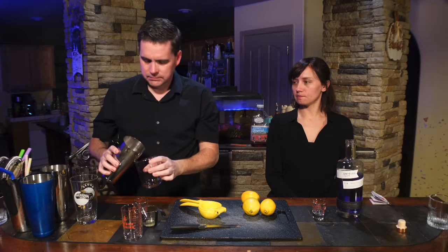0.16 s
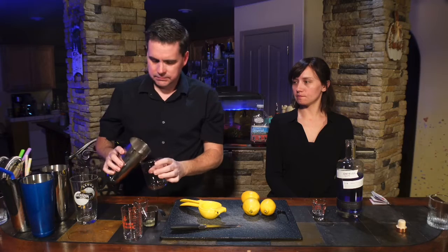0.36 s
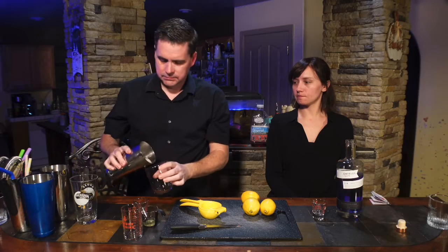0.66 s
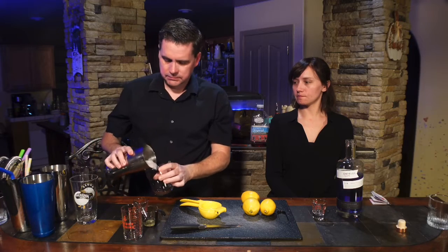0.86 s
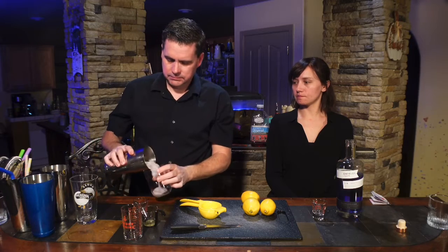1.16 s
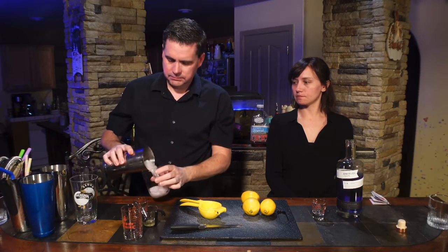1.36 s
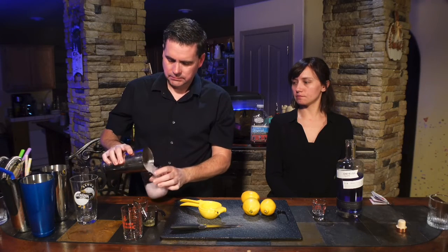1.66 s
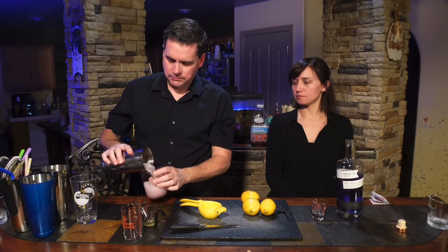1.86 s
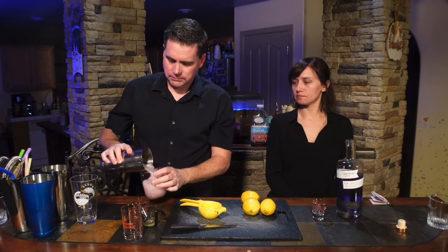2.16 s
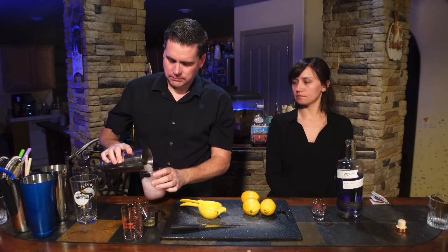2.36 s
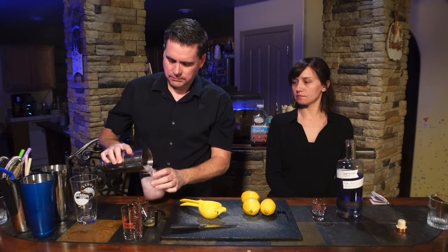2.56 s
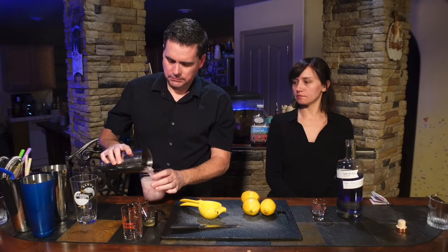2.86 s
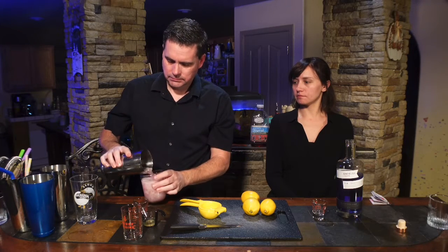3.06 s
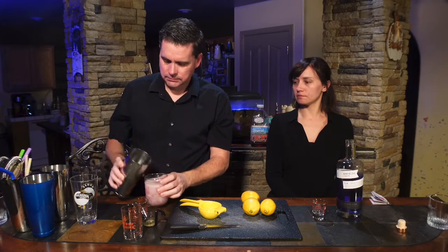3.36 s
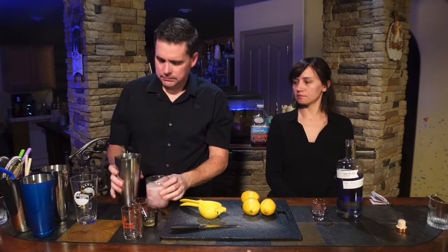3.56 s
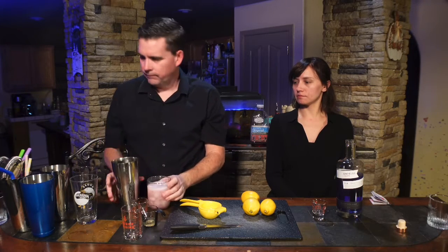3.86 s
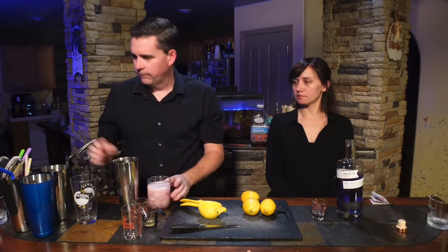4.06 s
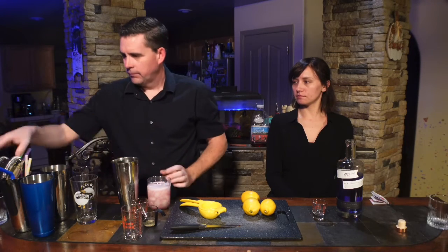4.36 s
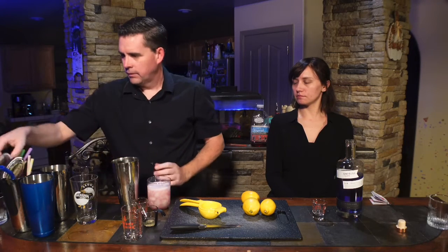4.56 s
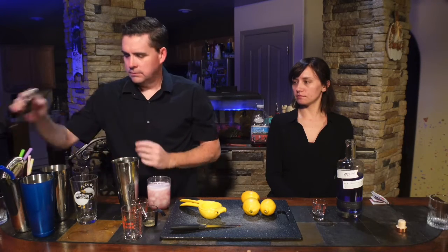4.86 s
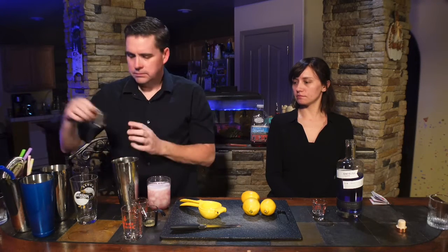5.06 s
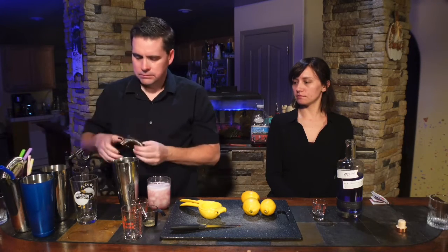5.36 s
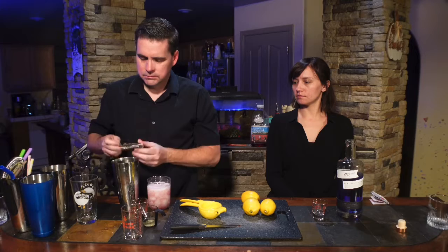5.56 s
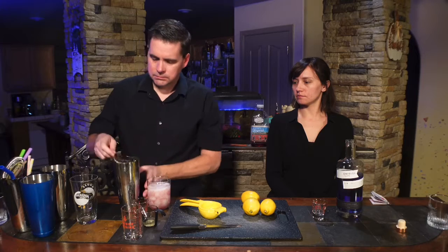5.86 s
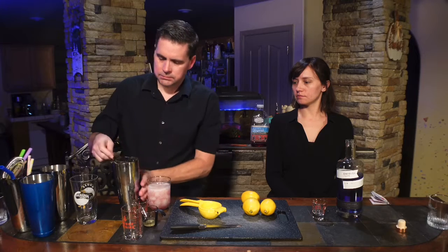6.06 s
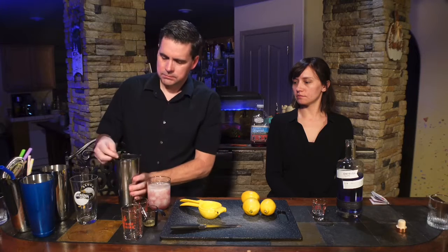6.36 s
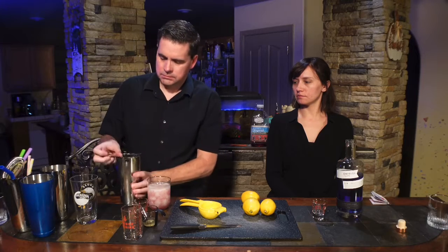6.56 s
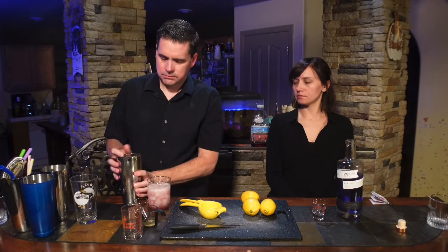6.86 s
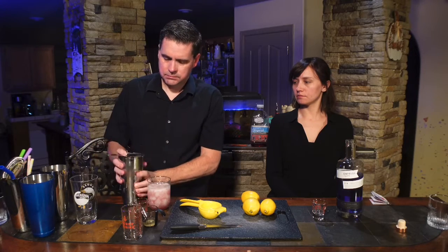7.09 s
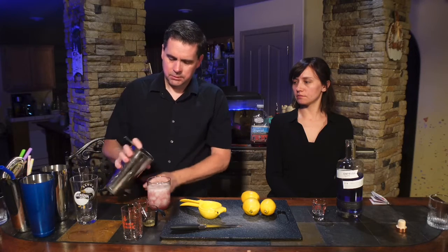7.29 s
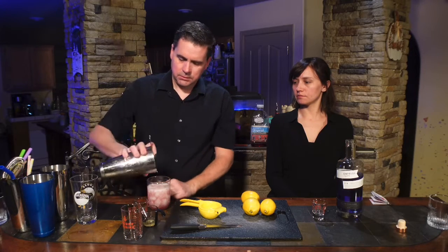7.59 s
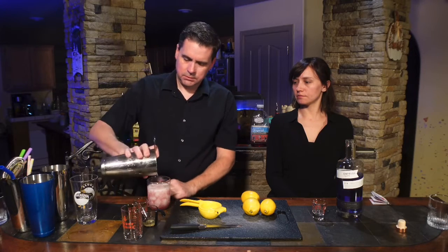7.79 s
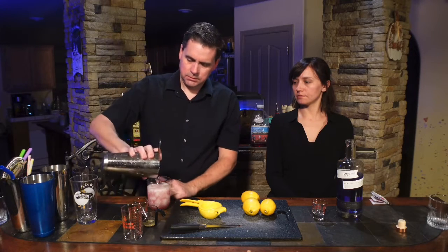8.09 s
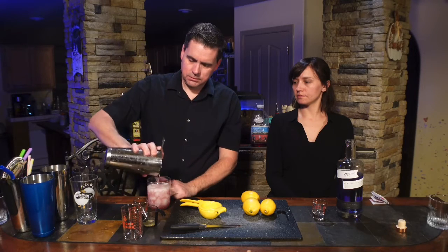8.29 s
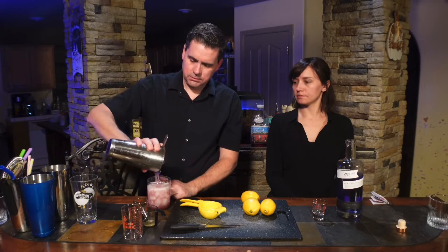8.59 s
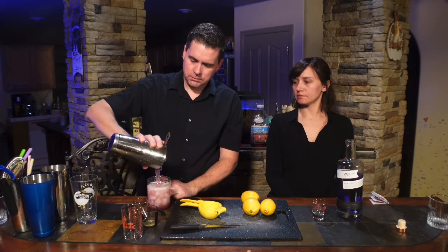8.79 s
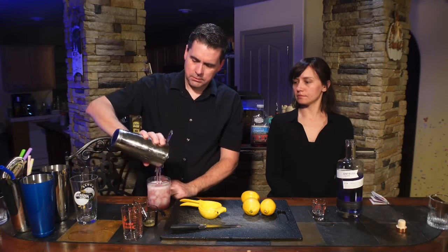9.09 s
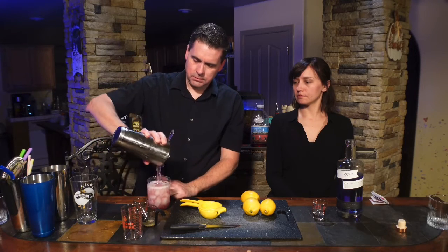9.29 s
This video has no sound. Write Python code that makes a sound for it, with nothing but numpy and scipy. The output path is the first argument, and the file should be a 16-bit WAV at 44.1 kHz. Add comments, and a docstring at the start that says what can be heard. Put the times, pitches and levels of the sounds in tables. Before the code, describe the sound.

Liquid dribbles from a metal shaker, then ice and drink tumble into a glass; shaker knocks, a strainer clinks and rasps, and a thin trickle follows.

```python
"""A little drink dribbles from a steel shaker into a glass, then ice and drink pour in together.
Cubes clack, shards tinkle and air pockets ring; the glass's hollow note climbs during the pour.
The shaker knocks down on the bar, a spring strainer clinks, its coils rasp over the rim, and the base drags.
Last, the rest trickles out. Blows are noise bursts and fading tones; flows are showers of tiny impacts.
A live, stone-walled room answers every sound, over a steady hiss and faint hum."""
import sys
import numpy as np
from scipy import signal
from scipy.io import wavfile
from scipy.ndimage import uniform_filter1d

SR = 44100
rng = np.random.default_rng(int(sys.argv[2]) if len(sys.argv) > 2 else 0)


def put_to_file(sound):
    """Save the sound as 16-bit audio at rate SR, in the file named by the first command-line argument."""
    columns = np.atleast_2d(sound).T  # one column per channel
    safe = np.clip(columns, -1, 1)
    whole_steps = np.round(safe * 32767)
    wavfile.write(sys.argv[1], SR, whole_steps.astype(np.int16))


N = 415863
TIME = np.arange(N) / SR
RING_TIME = TIME[:SR // 2]  # half a second, for single blows
EDGE_HZ = 15950  # nothing sounds above this
# Levels in the tables are relative: the settings ending in _db shift them. t60 is the time to fade by 60 dB.


def amp(db):
    """Turns decibels into gain."""
    return 10 ** (np.asarray(db) / 20)


def unit(x):
    """Scales a sound to an average (rms) level of 1."""
    return x / np.sqrt(np.mean(x ** 2) + 1e-20)


def unit_peak(x, size=132):
    """Scales a sound so that its loudest stretch of `size` samples has rms 1."""
    return x / np.sqrt(uniform_filter1d(x ** 2, size, mode="constant").max() + 1e-20)


def read(points, hz):
    """Reads a table of frequencies on a logarithmic axis."""
    f, value = np.transpose(points)
    return np.interp(np.log(hz + 1), np.log(f + 1), value)


def level(rows):
    """Turns a level curve into gain over time, silent outside the curve."""
    s, db = np.transpose(rows)
    return amp(np.interp(TIME, s, db)) * (TIME >= s[0]) * (TIME <= s[-1])


def add(mix, s, sound):
    """Mixes a sound in at time s."""
    part = mix[max(round(s * SR), 0):][:len(sound)]
    part += sound[:len(part)]


def colour(x, spectrum, size=4096):
    """Filters to a given spectrum without sounding ahead of time, so attacks stay sharp."""
    log_gain = np.log(amp(read(spectrum, abs(np.fft.fftfreq(size, 1 / SR)))))
    minimum_phase = np.exp(np.conj(signal.hilbert(log_gain)))
    taps = np.fft.ifft(minimum_phase).real[:size // 2]
    return signal.fftconvolve(x, taps)[:len(x)]


def high_pass(x, hz, order=4):
    """Removes what lies below hz."""
    return signal.sosfilt(signal.butter(order, hz, "high", fs=SR, output="sos"), x)


def resonate(x, hz, width_hz):
    """A resonance of gain 1 whose pitch follows hz, a number or a curve."""
    turn = np.exp(2j * np.pi * np.cumsum(hz * np.ones(len(x))) / SR)
    r = np.exp(-np.pi * width_hz / SR)
    # shift the pitch down to zero, smooth, and shift it back
    return 2 * (turn * signal.lfilter([1 - r], [1, -r], x / turn + 1e-18)).real


def contact(t60):
    """The dense, quickly dying chatter of one blow: fading noise."""
    return rng.standard_normal(len(RING_TIME)) * np.exp(-np.log(1000) * RING_TIME / t60)


def ring(modes, detune=0.0016):
    """Fading tones; grip and point of contact weight and detune them anew for each blow."""
    hz, db, t60 = np.transpose(modes)[:, :, None]
    weight, phase, shift = rng.standard_normal((3, len(modes), 1))
    hz = hz * (1 + detune * shift)
    size = amp(db + 3 * weight) * (hz < EDGE_HZ)
    fade = np.exp(-np.log(1000) * RING_TIME / t60)
    tones = size * fade * np.sin(2 * np.pi * (hz * RING_TIME + phase))
    return unit_peak(tones.sum(0))


def jangle(modes, t60, detune=0.0074):
    """Modes struck by three chattering contacts, each detuned afresh, which smears their pitch."""
    rings = sum(signal.fftconvolve(contact(t60), ring(modes, detune))[:len(RING_TIME)] for _ in range(3))
    return unit_peak(rings)


def grains(per_s, spread_db):
    """Random tiny impacts, mostly small and a few large."""
    size = amp(spread_db * np.minimum(rng.exponential(1, N), 4)) * rng.choice([-1, 1], N)
    return unit(size * (rng.random(N) < per_s / SR))


def strokes(rows, attack_s, release_s, swell_db):
    """Gain over time of rubbing strokes: each sets in, swells or eases while it lasts, and dies away."""
    out = np.zeros(N)
    for start, length, db in rows:
        age = np.maximum(TIME - start, 0)
        held = amp(db + swell_db * (np.minimum(age / length, 1) - .5))
        out += np.minimum(age / attack_s, 1) * held * np.exp(-np.maximum(age - length, 0) / release_s)
    return out


def wander(span_s):
    """Smooth random motion of rms 1 that changes over about span_s."""
    size = max(int(span_s * SR), 2)
    return unit(uniform_filter1d(uniform_filter1d(rng.standard_normal(N), size), size // 2))


def bubbles(per_s, low_hz, high_hz, cycles, count=24):
    """Small bubbles of many sizes, each a short ping that rises in pitch."""
    out, t = np.zeros(N), RING_TIME[:SR // 20]
    for hz in np.geomspace(low_hz, high_hz, count):
        age = t * hz / cycles
        ping = np.exp(-age) * np.sin(2 * np.pi * hz * t * (1 + .01 * age))
        for s, luck, size in rng.random((round(N / SR) * 10, 3)):
            if luck < per_s / count / 10:
                add(out, s * N / SR, amp(16 * size) * ping)
    return unit(out)


# note of the air above the drink: (time [s], pitch [Hz])
HOLLOW_NOTE = [(0, 970), (.7, 876), (1.12, 730), (1.42, 733), (1.62, 800), (1.85, 964), (2.2, 1160),
               (2.7, 1288), (7.6, 1274), (9.4, 1310)]


def hollow_hz(s):
    """The hollow note at time s, read from HOLLOW_NOTE: it sinks in the dribble, then climbs in the pour."""
    return np.interp(s, *np.transpose(HOLLOW_NOTE))


def hollow(x, hz, width_hz):
    """The air above the drink: one resonance, with no bass below it."""
    return high_pass(resonate(resonate(x, hz, 2 * width_hz), hz, width_hz), hz=464)


def stream(flow, spectrum, per_s, splash_db, bubble_db, hollow_db, width_hz, hollow_growth, lumpy_db):
    """Drops and chips patter into the glass, raise bubbles and sound its hollow note."""
    drops = grains(per_s, spread_db=4)
    fizz = bubbles(per_s=180, low_hz=1100, high_hz=7000, cycles=14)
    patter = amp(splash_db) * unit(colour(drops, spectrum)) + amp(bubble_db) * fizz
    gain = level(flow)
    # the share of the hollow note changes with the flow
    share = np.maximum(gain / gain.max(), amp(-40)) ** hollow_growth
    air_note = unit(hollow(drops, hollow_hz(TIME), width_hz)) * share
    lumps = unit(amp(lumpy_db * wander(span_s=0.038)))
    return gain * lumps * (patter + amp(hollow_db) * air_note)


# colour of the room's hiss: (frequency [Hz], level per Hz [dB])
HISS_COLOUR = [(15, -90), (25, -34), (130, -18.5), (170, -14), (384, -6.5), (775, 1.5), (1260, 1.5),
               (1480, 2.5), (2110, 2), (2350, -2), (3430, 2), (4140, -2.5), (10400, -5.5), (14800, -13.5),
               (16000, -12.5)]
# tones of the hum: (frequency [Hz], level [dB])
HUM_TONES = [(120, -99), (180, -83.5)]


def air(hiss_db=-56.5, side_db=-13):
    """Steady room hiss, partly different in each ear, and a faint mains hum."""
    mid, side = (unit(colour(noise, HISS_COLOUR)) for noise in rng.standard_normal((2, N)))
    hum = sum(amp(db) * unit(np.sin(2 * np.pi * hz * TIME)) for hz, db in HUM_TONES)
    return amp(hiss_db) * (mid + np.array([[1], [-1]]) * amp(side_db) * side) + hum


# flow of the first liquid over the shaker's lip: (time [s], level [dB])
DRIBBLE_FLOW = [(0.0, -49.5), (0.076, -48.5), (0.468, -62.5), (0.762, -39), (1.1, -43)]
# colour of wet sliding, for the dribble and for ice on steel: (frequency [Hz], level per Hz [dB])
SLIDE_COLOUR = [(100, -63), (350, -27.5), (900, -0.5), (1600, 3.5), (2600, 9), (4000, 1.5), (7000, -2),
                (11000, -6.5), (16000, -13)]


def dribble():
    """The first liquid runs evenly into the glass, with patter and bubbles about equally strong."""
    return stream(DRIBBLE_FLOW, SLIDE_COLOUR, per_s=1300, splash_db=-14.0, bubble_db=-15,
                  hollow_db=-11.5, width_hz=220, hollow_growth=0.0634, lumpy_db=0.0)


# fingers brushing over the strainer's spring and the wet steel: (start [s], length [s], level [dB])
BRUSH_STROKES = [(.048, 0.014, -57), (4.09, 0.04, -53), (5.248, 0.006, -56), (5.55, 0.051, -49.5),
                 (8.855, 0.011, -52.5), (9.04, 0.046, -53), (9.29, 0.053, -49.5)]
# colour of the brushing: (frequency [Hz], level per Hz [dB])
BRUSH_COLOUR = [(300, -36), (2000, -8.5), (5000, -5), (8000, -7.5), (13000, -7.5), (16000, -27)]


def brushes():
    """Fingers catch on many tiny bumps as they brush along the metal."""
    touch = unit(colour(grains(per_s=2700, spread_db=5.5), BRUSH_COLOUR))
    return strokes(BRUSH_STROKES, attack_s=0.0022, release_s=0.028, swell_db=0.5) * touch


# single crunches of wet ice, loud and faint, the first a soft one before the pour:
# (time [s], crunch level [dB], level of the glass's hollow [dB])
SINGLE_CRUNCHES = [(0.053, -42, -46), (1.320, -28, -14), (1.415, -15.5, -46), (1.5938, -16, -17.5),
                   (1.8445, -17.5, -31), (2.014, -23, -37), (2.2182, -26, -20), (2.2616, -17, -34),
                   (2.5355, -43, -27.5)]
# colour of rattling ice: (frequency [Hz], level per Hz [dB])
RATTLE_COLOUR = [(40, -41.5), (120, -40), (350, -5.5), (700, -5.5), (1600, 2), (2500, 0.5), (4000, 4.5),
                 (5600, 0.5), (7200, 4.5), (10000, -3), (16000, -29)]
# tones of the struck glass: (frequency [Hz], level [dB], t60 [s])
GLASS_MODES = [(2180, -8, .1), (2530, -2, .1), (2600, -3, .1), (2810, -3, .08), (3150, -4, .06),
               (3600, -3, .06), (4400, -2, .06), (6900, -5, .07), (7100, -3, .08), (9100, -10, .05),
               (10000, -10, .05), (13000, -11, .04)]


def crunches(clumps, crunch_db=-8, hollow_db=-3, glass_db=-15, swell_s=0.0033, width_hz=220):
    """A clump collapses in a quick swell of many small contacts, which ring the glass and its air."""
    out, age = np.zeros(N), RING_TIME / swell_s
    for s, db, air_db in clumps:
        contacts = rng.standard_normal(len(age)) ** 3 * age * np.exp(-age)
        glass = signal.fftconvolve(contacts, ring(GLASS_MODES, detune=.02))[:len(age)]
        crunch = unit_peak(colour(contacts, RATTLE_COLOUR))
        thump = unit_peak(hollow(contacts, hollow_hz(s), width_hz))
        add(out, s, amp(db + crunch_db) * crunch + amp(db + glass_db) * unit_peak(glass))
        add(out, s, amp(air_db + hollow_db) * thump)
    return out


# cubes catching the rim of the glass: (time [s], level [dB])
RIM_HITS = [(1.117, -33), (1.205, -37), (1.292, -35), (1.323, -41), (1.6, -39), (1.81, -44)]
# tones of the rim: (frequency [Hz], level [dB], t60 [s])
RIM_MODES = [(13600, 1, 0.12), (14080, -1.5, .08), (14480, -14.5, .08)]


def pings(ping_db=-3):
    """The rim's thin, very high ring."""
    out = np.zeros(N)
    for s, db in RIM_HITS:
        add(out, s, amp(db + ping_db) * jangle(RIM_MODES, t60=.02))
    return out


# cubes striking the glass squarely: (time [s], clack level [dB], level of the glass's hollow [dB],
# the cube's own pitch [Hz], t60 of its chatter [s])
CUBE_HITS = [(1.118, -11, -30.5, 2790, 0.015), (1.2914, -23.5, -34, 2230, 0.037),
             (1.3228, -16.5, -26, 2750, 0.075), (1.4794, -19.5, -24.5, 3270, 0.049),
             (1.5478, -23.5, -37, 3650, 0.023), (1.5688, -17, -20, 2470, 0.067),
             (1.6531, -30, -30, 2800, 0.031), (1.681, -15.5, -30, 2530, 0.023),
             (1.7262, -21.5, -25, 2540, .025), (1.7698, -23, -23.5, 2530, .025),
             (1.8114, -14, -26, 2410, 0.015), (1.9022, -14, -47, 4370, 0.0092),
             (1.9657, -20, -30.5, 2610, 0.017), (1.997, -28, -23.5, 3320, .025),
             (2.2652, -31, -32, 4500, .02), (2.363, -22.5, -22.5, 2560, 0.041),
             (2.6001, -22.5, -25, 1590, 0.034), (2.6327, -26, -45, 1550, .025),
             (2.794, -33.5, -57, 2510, 0.022), (2.818, -24, -25, 1580, 0.068),
             (2.8916, -10.5, -34, 4370, 0.0084), (2.907, -21.5, -39, 2780, 0.011),
             (2.997, -34, -37, 4400, 0.032), (3.223, -25.5, -41, 7100, .025),
             (3.3295, -24.5, -42, 2550, .03), (3.3782, -28, -27.5, 1520, 0.028),
             (3.449, -18, -47, 2770, 0.027), (3.491, -24.5, -40, 2600, .012),
             (7.321, -28.5, -39, 1640, 0.034)]
# colour of the clack: (frequency [Hz], level per Hz [dB])
CLACK_COLOUR = [(40, -53.5), (120, -44), (350, -45), (700, -8.5), (1600, 1), (2700, 5.5), (4200, 0.5),
                (6000, -3.5), (9000, -10), (13000, -19.5), (16000, -41)]
# a cube's own ring: (multiple of its pitch, level [dB], t60 [s])
CUBE_MODES = [(1, 0, .025), (1.13, -5, .015), (1.24, -3, .02), (1.525, 0, .03), (1.85, -6, .012),
              (2.33, -5, .025), (3.36, -17, .012)]


def ice(clack_db=-6, hollow_db=-2, glass_db=-12, cube_db=-8, width_hz=190):
    """Each cube clacks, rings itself and the glass, and thumps the air inside."""
    out = np.zeros(N)
    for s, db, air_db, hz, chatter_s in CUBE_HITS:
        cube = np.array(CUBE_MODES) * [hz, 1, 1]
        clack = unit_peak(colour(contact(chatter_s), CLACK_COLOUR))
        clack += amp(glass_db) * jangle(GLASS_MODES, t60=.01, detune=.02)
        clack += amp(cube_db) * unit_peak(ring(cube, detune=.006) + jangle(cube, t60=.008, detune=.015))
        thump = unit_peak(hollow(contact(t60=0.047), hollow_hz(s), width_hz))
        add(out, s, amp(db + clack_db) * clack + amp(air_db + hollow_db) * thump)
    return out


# air pockets ringing in the drink: (time [s], pitch [Hz], level [dB])
AIR_POCKETS = [(1.119, 684, -31), (1.292, 760, -27.5), (1.325, 693, -16), (1.594, 1956, -26.5),
               (1.33, 510, -47), (1.59, 494, -42.5), (1.675, 389, -41), (1.735, 344.8, -40.5),
               (2.222, 1036, -27), (2.825, 1580, -31), (3.284, 1225, -36), (3.356, 1040, -32),
               (3.379, 586, -35), (7.318, 1577, -33), (7.747, 487, -53.5), (8.15, 940, -60),
               (8.644, 423, -65.5), (9.011, 1024, -62), (9.175, 1635, -51.5), (9.215, 1650, -55)]


def gulps(glide=0.098, cycles=56):
    """Air pockets dragged under by the ice ring and rise a little; small, high ones die sooner."""
    out, t = np.zeros(N), RING_TIME
    swell = 1 - np.exp(-(t / .003) ** 2)
    for s, hz, db in AIR_POCKETS:
        decay = np.exp(-np.log(1000) * t * hz / cycles)  # down 60 dB after this many cycles
        tone = np.sin(2 * np.pi * hz * t * (1 + glide * t))
        add(out, s, amp(db) * unit_peak(swell * decay * tone))
    return out


# flow of ice and drink into the glass: (time [s], level [dB])
POUR_FLOW = [(1.13, -39), (1.21, -32.5), (1.28, -38), (1.31, -33), (1.44, -28.5), (1.54, -35), (1.6, -30),
             (1.84, -27), (1.99, -29.5), (2.18, -36), (2.27, -34.5), (2.72, -40), (3.05, -37),
             (3.17, -40.5), (3.331, -43)]


def pour():
    """Ice and drink tumble in together, in lumps that make the level waver."""
    return stream(POUR_FLOW, RATTLE_COLOUR, per_s=270, splash_db=-11.0, bubble_db=-13.5,
                  hollow_db=-11.0, width_hz=460, hollow_growth=0.12, lumpy_db=7.5)


def pour_clumps(per_s=14, clump_db=2, spread_db=2.5, hollow_db=-8):
    """Clumps at random times in the pour, with levels that follow its flow, as rows for crunches()."""
    s, flow_db = np.transpose(POUR_FLOW)
    slots = np.arange(60) / per_s + s[0]
    times = slots + rng.random(len(slots)) / per_s
    db = np.interp(times, s, flow_db) + clump_db + spread_db * rng.standard_normal(len(slots))
    return [row for row in zip(times, db, db + hollow_db) if row[0] < s[-1]]


def chips(per_s, low_hz, high_hz, cycles, tilt_db, count=40):
    """Small shards of ice, each ticking at its own pitch; tilt_db is the change per octave."""
    out, t = np.zeros(N), RING_TIME[:SR // 80]
    for hz in np.geomspace(low_hz, high_hz, count):
        tick = np.exp(-t * hz / cycles) * np.sin(2 * np.pi * hz * t)
        tick *= amp(tilt_db * np.log2(hz / low_hz))
        for s, luck, size in rng.random((round(N / SR) * 40, 3)):
            if luck < per_s / count / 40:
                add(out, s * N / SR, amp(15 * size ** 2) * tick)
    return unit(high_pass(out, hz=1500))


def tinkle(tinkle_db=-7.0, glass_db=-20):
    """Shards tumble with the stream; at the height of the pour they keep the glass's high modes ringing."""
    shards = chips(per_s=170, low_hz=2000, high_hz=14800, cycles=4, tilt_db=-.5)
    glass = signal.oaconvolve(shards, jangle(GLASS_MODES, t60=.01, detune=.015))[:N]
    glass = unit(high_pass(glass, hz=5600))
    flow = level(POUR_FLOW)
    return flow * (amp(tinkle_db) * shards + amp(glass_db) * (flow / flow.max()) ** 2 * glass)


# modes of glass and shaker that the running ice keeps alive: (frequency [Hz], width [Hz], level [dB])
SINGING_MODES = [(2540, 350, -14.5), (6740, 300, -13.5), (12800, 360, -24.5)]


def singing_wall():
    """Ice running over the lip and down the glass keeps strong modes singing, most at full flow."""
    flow, rub = level(POUR_FLOW), grains(per_s=350, spread_db=3)
    song = np.zeros(N)
    for hz, width_hz, db in SINGING_MODES:
        song += amp(db) * unit(resonate(resonate(rub, hz, width_hz), hz, 2 * width_hz))
    return flow ** 2 / flow.max() * song


# how much the slush churns in the glass: (time [s], level [dB])
CHURN_LEVEL = [(1.3, -62.5), (1.65, -36.5), (2.0, -39.5), (2.3, -37), (2.76, -48), (2.86, -37), (3.15, -65),
               (3.29, -53), (3.37, -32.5), (3.489, -38)]


def slush(wet_db=-1, deep_db=-15, deep_ratio=0.435, spread_octaves=0.24, spread_db=4, cycles=26, count=170):
    """Pockets between the cubes ring briefly near the glass's note, or fainter and deep under the ice."""
    out, t = np.zeros(N), RING_TIME[:SR // 8]
    when, churn_db = np.transpose(CHURN_LEVEL)
    for k, (late, pitch, size) in enumerate(rng.uniform(-0.89, 1, (count, 3))):
        s = when[0] + (when[-1] - when[0]) * (k + late) / count
        ratio, db = (deep_ratio, deep_db) if k % 3 == 0 else (1, 0)  # every third pocket is deep
        hz = hollow_hz(s) * ratio * 2 ** (spread_octaves * (2 * pitch + .5))
        fade = (1 - np.exp(-t * hz)) * np.exp(-np.log(1000) * t * hz / cycles)
        ping = fade * np.sin(2 * np.pi * hz * t * (1 + t))
        db += np.interp(s, when, churn_db) + wet_db + spread_db * size
        add(out, s, amp(db) * unit_peak(ping))
    return out


# ice sliding along the shaker wall: (start [s], length [s], level [dB])
SLIDE_STROKES = [(1.57, 0.16, -58), (2.21, 0.047, -32), (3.25, 0.096, -41.5), (3.345, 0.12, -31),
                 (6.97, 0.19, -51), (7.18, 0.1, -50), (7.29, 0.022, -45), (8.638, 0.029, -47)]
# tones of the shaker's steel: (frequency [Hz], level [dB], t60 [s])
STEEL_MODES = [(339, -11, .4), (570, -11, .25), (1550, -15, .12), (2190, -15, .15), (2530, -12, .08),
               (4215, -2, .04), (4380, -2, .04), (6900, -4, .04), (7030, -2, .04), (7230, -3, .04),
               (7450, -8, .03), (10790, -13, .04), (11000, -14, .04)]


def slides(steel_db=-10):
    """Wet ice grates along the steel wall and stirs its high modes."""
    rub = grains(per_s=1500, spread_db=3.2)
    steel = signal.oaconvolve(rub, jangle(STEEL_MODES, t60=0.009))[:N]
    steel = unit(high_pass(steel, hz=5300))
    grating = unit(colour(rub, SLIDE_COLOUR)) + amp(steel_db) * steel
    return strokes(SLIDE_STROKES, attack_s=0.0086, release_s=0.0075, swell_db=2) * grating


def rocking(loss_db, t60, count=6):
    """Chatter of a blow and its rebounds, which come at uneven intervals and weaken."""
    out, s = np.zeros(len(RING_TIME)), 0
    for rebound in range(count):
        add(out, s, amp(-loss_db * rebound) * contact(t60))
        s += 0.019 * rng.uniform(.5, 1.5)  # seconds to the next rebound
    return out


def rocked(modes, loss_db, t60):
    """Modes struck by a blow and its rebounds, three times over and detuned each time."""
    rings = sum(signal.fftconvolve(rocking(loss_db, t60), ring(modes, detune=.015))[:len(RING_TIME)]
                for _ in range(3))
    return unit_peak(rings, size=880)


# the shaker knocking on the bar: (time [s], clatter of its load [dB], thud of its base [dB],
# low boom [dB], steel ring [dB], hum of its air column [dB], loss at each rebound [dB])
SHAKER_KNOCKS = [(3.517, -13.5, -16.5, -36.5, -54, -40, 9), (3.542, -36, -32, -38, -49, -38, 9),
                 (3.641, -16.5, -14.5, -17.5, -28, -15, 4), (3.693, -22, -15, -21.5, -38, -17.5, 3.5),
                 (5.856, -30, -33, -38.5, -38.5, -31, 4), (6.005, -38, -35, -31, -57, -39, 7),
                 (6.322, -22, -30, -34, -33, -24, 9), (6.342, -20, -19, -24.5, -32, -20, 5.5),
                 (6.598, -19, -16, -19.5, -36, -24, 10), (7.173, -33.5, -33, -35, -40, -44, 6.5)]
# colour of the thud: (frequency [Hz], level per Hz [dB])
THUD_COLOUR = [(30, -40), (200, -35), (450, -12), (680, 5.5), (900, -4), (1400, -9.5), (3000, -38),
               (8000, -66)]
# colour of the clatter: (frequency [Hz], level per Hz [dB])
CLATTER_COLOUR = [(30, -62), (100, -32), (220, -30), (340, -19), (550, -3), (800, 2.5), (1500, 4.5),
                  (2200, -0.5), (3200, -10), (6000, -19), (16000, -27.5)]
# colour of the bar top's boom: (frequency [Hz], level per Hz [dB])
BOOM_COLOUR = [(25, -30), (70, -40), (120, -16), (190, -0.5), (250, 1.5), (330, 14.5), (450, 7.5),
               (570, 15.5), (800, 3), (1500, -29), (4000, -81)]
# tones of the loaded shaker standing on the bar: (frequency [Hz], level [dB], t60 [s])
BODY_MODES = [(593, -7, 0.066), (704, 0, 0.032), (768, 2, 0.046), (890, 2, 0.022), (970, 3.5, 0.037),
              (1060, 4.5, 0.067), (1090, -2, 0.025), (1280, 3.5, 0.015), (1326, 3, 0.013),
              (1440, -3, 0.024), (1575, -1.5, 0.083), (1680, -5, 0.047), (2040, -6.5, 0.037),
              (2190, 5, .025), (2510, -17, .02)]


def knocks(clatter_db=-5, body_db=-8, thud_db=-1, boom_db=-11, steel_db=-3, column_db=-8, chatter_t60=0.025):
    """The base thuds, the load clatters and rings steel and air, the bar booms: thuds, clatter, booms."""
    thuds, clatter, booms = np.zeros((3, N))
    thud = unit_peak(colour(signal.unit_impulse(len(RING_TIME)), THUD_COLOUR))
    for s, db, base_db, low_db, ring_db, air_db, loss_db in SHAKER_KNOCKS:
        chatter = rocking(loss_db, chatter_t60)
        rings = amp(db + body_db) * rocked(BODY_MODES, loss_db, chatter_t60)
        rings += amp(ring_db + steel_db) * rocked(STEEL_MODES, loss_db, chatter_t60)
        rings += amp(air_db + column_db) * ring([(567, 0, 0.21)])  # air column: Hz, dB, t60 in s
        add(thuds, s, amp(base_db + thud_db) * thud)
        add(clatter, s, amp(db + clatter_db) * unit_peak(colour(chatter, CLATTER_COLOUR), size=440))
        add(clatter, s, high_pass(rings, hz=303))
        add(booms, s, amp(low_db + boom_db) * unit_peak(colour(chatter, BOOM_COLOUR), size=880))
    return thuds, clatter, booms


# the strainer clinking against steel or ice: (time [s], tick level [dB], ring of its plate [dB])
STRAINER_CLINKS = [(3.87, -49, -60), (4.03, -49.5, -62), (4.449, -52, -46), (4.484, -44, -35),
                   (4.517, -31, -23), (4.576, -34, -27.5), (4.612, -32.5, -33.5), (4.749, -40.5, -43.5),
                   (5.254, -46, -57), (5.455, -47, -56), (5.532, -44, -55.5), (5.804, -33, -33),
                   (5.855, -19.5, -24.5), (5.956, -31.5, -37), (6.325, -23.5, -38), (6.603, -28, -31),
                   (7.098, -37.5, -46), (8.958, -43.5, -63), (9.289, -42.5, -56)]
# colour of the tick: (frequency [Hz], level per Hz [dB])
CLINK_COLOUR = [(100, -36), (400, -15), (1000, -19), (2000, -5), (4000, -0.5), (7000, -2.5), (11000, -2.5),
                (16000, -7)]
# tones of the strainer's plate: (frequency [Hz], level [dB], t60 [s])
PLATE_MODES = [(2223, -11, .16), (2670, -4, .16), (2890, -7, .14), (3140, -8, .12), (4210, 1, .13),
               (4290, -5, .1), (5250, -3, .09), (5679, -3, .1), (5986, -4, .11), (6450, -7, .07),
               (6896, 0, .09), (7050, -4, .08), (7590, -6, .08), (7935, -4, .08), (9378, 1, .09),
               (9600, -3, .06), (9959, 0, .09), (11540, -6, .07), (11780, -2, .07), (13600, -7, .06)]
GRIP_DAMPING = .6  # share of its ring time that the gripped strainer keeps


def clinks(tick_db=-1, ring_db=-2, gripped_s=5.1):
    """The plate ticks and rings, more briefly from gripped_s on, when fingers damp it."""
    out = np.zeros(N)
    for s, db, plate_db in STRAINER_CLINKS:
        tick = unit_peak(colour(contact(t60=0.065), CLINK_COLOUR))
        modes = np.array(PLATE_MODES) * [1, 1, 1 if s < gripped_s else GRIP_DAMPING]
        plate = unit_peak(ring(modes, detune=.002) + .5 * jangle(modes, t60=.02, detune=.008))
        add(out, s, amp(db + tick_db) * tick + amp(plate_db + ring_db) * plate)
    return out


# the strainer's spring rubbing: (start [s], length [s], level [dB])
RASP_STROKES = [(4.448, 0.1, -42.5), (4.515, 0.12, -39.5), (5.797, 0.046, -41), (6.204, 0.016, -36.5),
                (6.25, 0.023, -32), (6.265, 0.045, -29), (6.81, 0.027, -28.5), (6.855, 0.021, -32.5)]
# colour of the spring: (frequency [Hz], level per Hz [dB])
SPRING_COLOUR = [(100, -38), (350, 3), (1000, 3.5), (2500, 7), (5000, 6.5), (9000, 4.5), (13000, 7.5),
                 (16000, -0.5)]


def rasps(rasp_db=-1, sing_db=-15):
    """The spring's coils tick over the rim one after another and make the damped plate sing."""
    ticks = unit(colour(grains(per_s=3900, spread_db=2.0), SPRING_COLOUR))
    coils = strokes(RASP_STROKES, attack_s=0.0085, release_s=0.014, swell_db=-0.5) * ticks
    plate = jangle(np.array(PLATE_MODES) * [1, 1, GRIP_DAMPING], t60=.01, detune=.012)
    song = signal.oaconvolve(coils, plate / np.linalg.norm(plate))[:N]
    return amp(rasp_db) * coils + amp(sing_db) * song


# the tin that holds the tools, jostled as the strainer is drawn out: (time [s], level [dB])
HOLDER_JOSTLES = [(4.49, -40), (4.556, -36.5), (4.746, -41), (4.946, -51)]
# tones of that tin: (frequency [Hz], level [dB], t60 [s])
HOLDER_MODES = [(483, -5, 0.067), (606, -7, 0.041), (696, -3.5, 0.053), (787, 7.5, 0.18), (1123, 4, 0.12)]


def holder(ring_db=-2):
    """The tin that holds the tools rings at each jostle."""
    out = np.zeros(N)
    for s, db in HOLDER_JOSTLES:
        add(out, s, amp(db + ring_db) * ring(HOLDER_MODES))
    return out


# the shaker's base dragged over the bar: (start [s], length [s], level [dB])
DRAG_STROKES = [(5.89, 0.052, -42), (5.995, 0.06, -44), (6.27, 0.15, -33), (6.94, 0.33, -53.5)]
# colour of the scraping bar top: (frequency [Hz], level per Hz [dB])
SCRAPE_COLOUR = [(40, -40), (150, -25), (240, -22), (325, 2.5), (450, -3), (550, 3.5), (700, -7),
                 (1100, -5), (2000, -17), (5000, -45)]


def drags(steel_db=-14):
    """The base sticks and slips on the bar top, which rumbles while the steel sings faintly."""
    slips = grains(per_s=500, spread_db=4.0)
    steel = unit(signal.oaconvolve(slips, ring(STEEL_MODES))[:N])
    scrape = unit(colour(slips, SCRAPE_COLOUR)) + amp(steel_db) * steel
    return strokes(DRAG_STROKES, attack_s=0.019, release_s=0.016, swell_db=-9.5) * scrape


# flow of the strained trickle: (time [s], level [dB])
TRICKLE_FLOW = [(7.42, -49.5), (7.66, -45), (7.76, -32.5), (7.81, -33), (7.87, -45), (8.14, -54.5),
                (8.22, -50.5), (8.55, -53.5), (8.81, -62.5), (9.26, -59), (9.43, -62)]
# colour of its splashing: (frequency [Hz], level per Hz [dB])
SPLASH_COLOUR = [(100, -38), (450, -27), (900, -17), (1300, -8), (1750, 8), (2100, 2), (2400, 12.5),
                 (3300, 17), (4500, 13.5), (6500, 11), (10000, 3), (16000, -8)]


def trickle():
    """The strainer evens out the last of the drink, so its level wavers little."""
    return stream(TRICKLE_FLOW, SPLASH_COLOUR, per_s=1100, splash_db=-4.0, bubble_db=-17.5,
                  hollow_db=-22.5, width_hz=56, hollow_growth=0.0, lumpy_db=1.5)


# pockets between the cubes: (frequency [Hz], width [Hz], level [dB])
CUBE_POCKETS = [(1257, 54, -12), (2106, 55, -8), (2430, 84, -7.5), (2850, 135, -8)]


def gurgle(gurgle_db=-1, count=420):
    """The thin strained stream plinks into pockets between the cubes, which keep changing size."""
    out, t = np.zeros(N), RING_TIME[:SR // 16]
    when, flow_db = np.transpose(TRICKLE_FLOW)
    for k, (late, pitch, size) in enumerate(rng.uniform(-1, 1, (count, 3))):
        s = when[0] + (when[-1] - when[0]) * (k + late + 1) / (count + 1)
        hz, width_hz, db = CUBE_POCKETS[k % len(CUBE_POCKETS)]
        fade = (1 - np.exp(-t * hz)) * np.exp(-np.pi * width_hz * t)
        plink = fade * np.sin(2 * np.pi * (hz + width_hz * pitch) * t)
        db += np.interp(s, when, flow_db) + gurgle_db + 6 * size
        add(out, s, amp(db) * unit_peak(plink))
    return out


# how long the room rings: (frequency [Hz], t60 [s])
ROOM_RING = [(100, 0.63), (350, 0.6), (800, 0.72), (2000, 0.83), (4000, 0.87), (8000, 0.6), (16000, 0.45)]
# the bass reaches both microphones nearly alike: (frequency [Hz], level of their difference [dB])
EAR_DIFFERENCE = [(100, -12), (300, -7), (700, -2), (2000, 0), (16000, -1)]


def room(x, wet_db, early_db=-7, side_db=-12, build_s=0.002, count=8):
    """Direct sound, echoes off the bar and walls, and a tail that differs a little between the ears."""
    t = TIME[:SR]
    taps = rng.choice([-1., 1.], (2, SR)) * (rng.random((2, SR)) < 4000 / SR)
    taps *= 1 - np.exp(-t / build_s)
    # each frequency of the tail fades at its own speed
    hz, age, z = signal.stft(taps, SR, nperseg=256)
    fade = np.exp(-np.log(1000) * age / read(ROOM_RING, hz)[:, None])
    tail = signal.istft(z * fade, SR, nperseg=256)[1][:, :SR]
    tail *= amp(wet_db) / np.linalg.norm(tail[0])
    for channel in tail:
        early = rng.integers(SR // 500, SR // 40, count)  # 2 to 25 ms
        channel[early] += amp(early_db) * rng.choice([-1, 1], count) / np.sqrt(count)
    mid, side = signal.fftconvolve(x[None], tail, axes=1)[:, :N]
    return x + mid + np.array([[1], [-1]]) * amp(side_db) * colour(side, EAR_DIFFERENCE)


def scene():
    """Glass, shaker and strainer in one room; the bar top's boom arrives mostly by way of the walls."""
    cubes = crunches(SINGLE_CRUNCHES + pour_clumps()) + pings() + ice() + tinkle() + singing_wall() + slides()
    liquid = dribble() + pour() + slush() + trickle() + gurgle()
    drink = room(cubes + liquid, wet_db=-0.5) + room(gulps(), wet_db=0.5)
    thuds, clatter, booms = knocks()
    shaker = room(thuds, wet_db=-3.0) + room(clatter + drags(), wet_db=1.0)
    shaker += room(booms, wet_db=5.5, build_s=0.015)
    tools = room(brushes() + clinks() + rasps() + holder(), wet_db=-1.0)
    return high_pass(drink + tools, hz=252, order=2) + shaker + air()


def record(dry):
    """The left microphone is slightly brighter than the right; both lose everything above EDGE_HZ."""
    left = colour(dry[0], [(2500, 0), (13000, .8)])
    right = colour(dry[1], [(2500, 0), (13000, -.8)])
    low_pass = signal.firwin(511, EDGE_HZ, window=("kaiser", 9), fs=SR)
    return signal.oaconvolve(np.array([left, right]), low_pass[None], "same", axes=1)


dry = scene()
out = record(dry)
put_to_file(out)
```